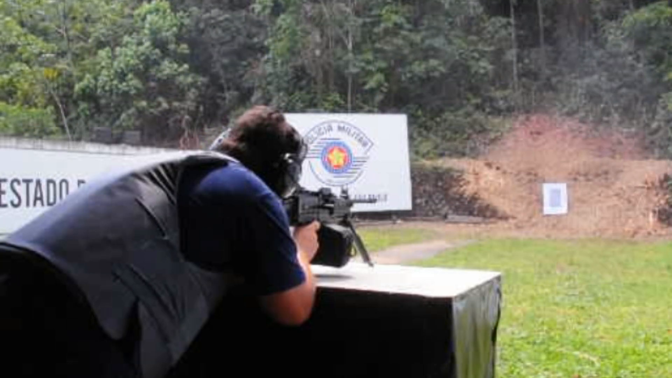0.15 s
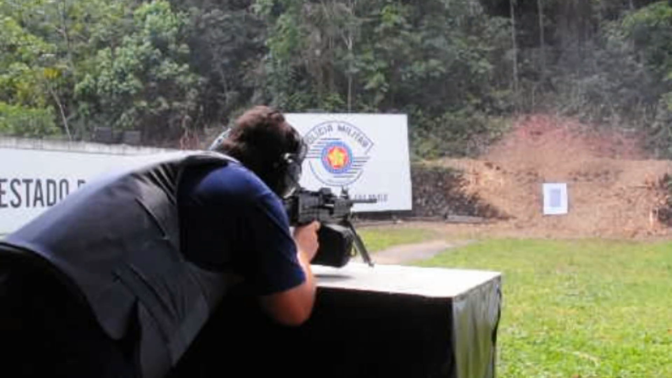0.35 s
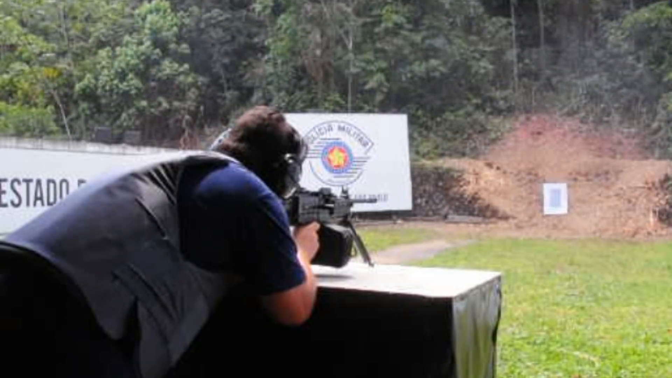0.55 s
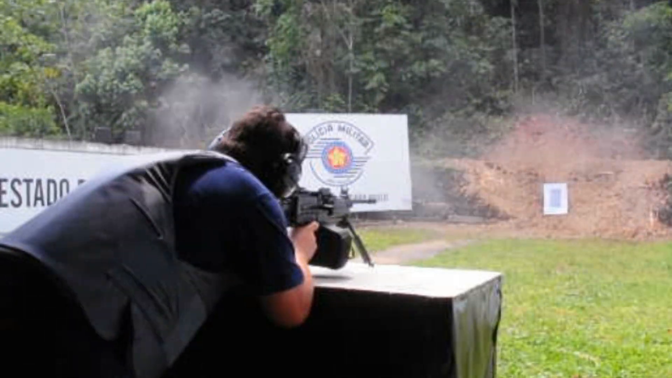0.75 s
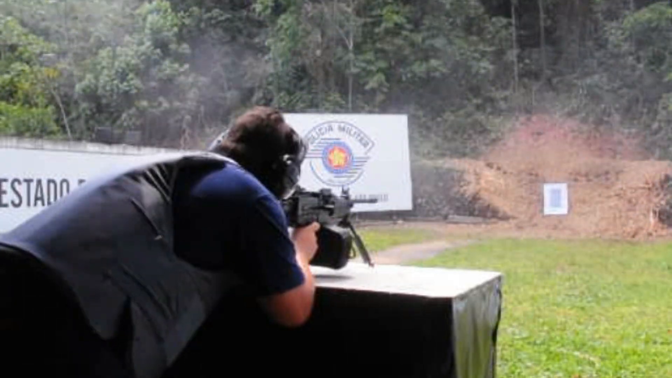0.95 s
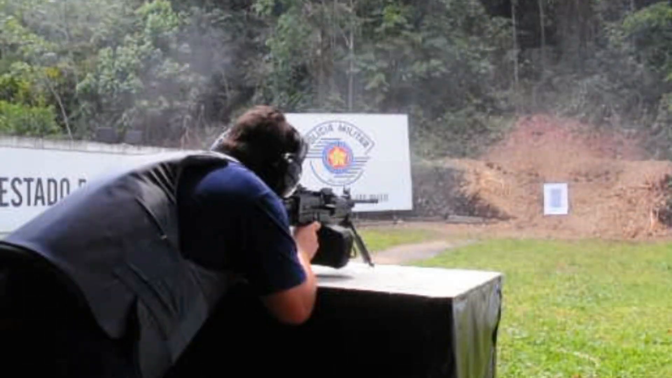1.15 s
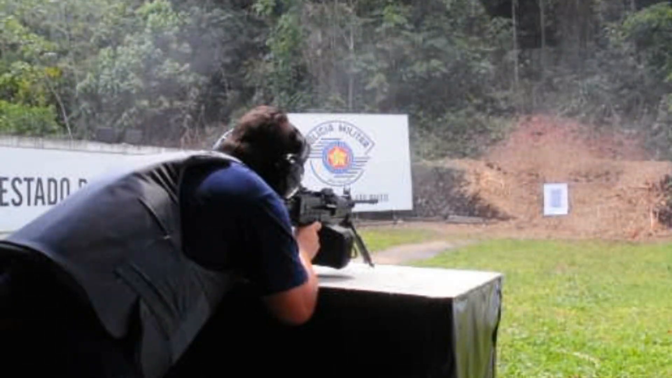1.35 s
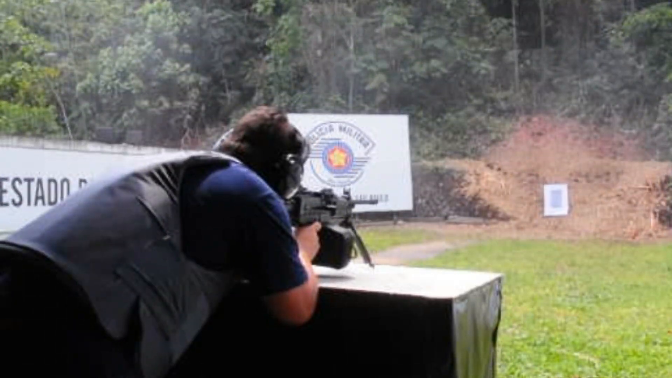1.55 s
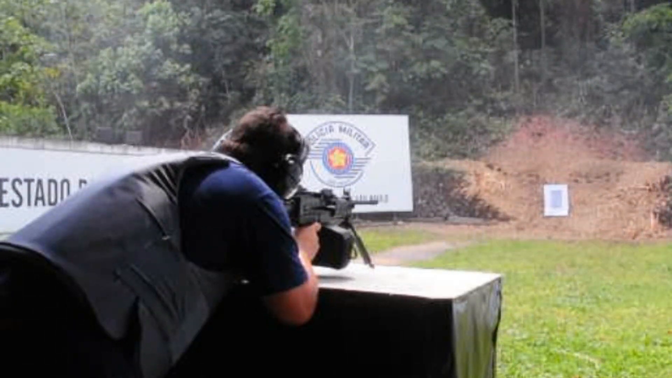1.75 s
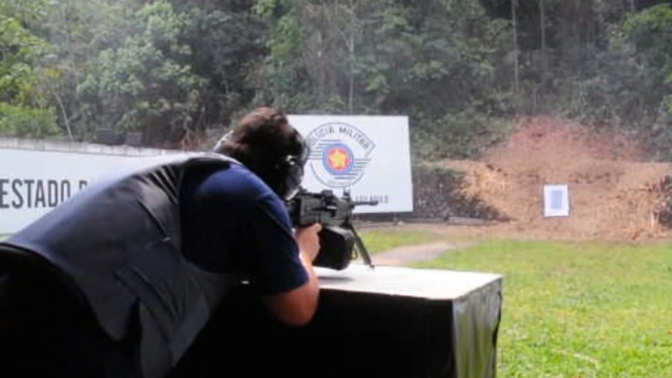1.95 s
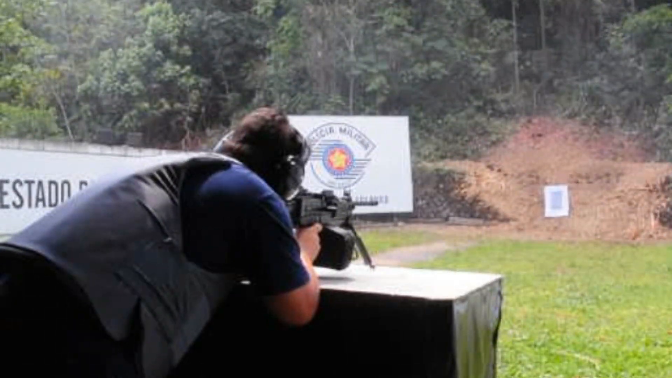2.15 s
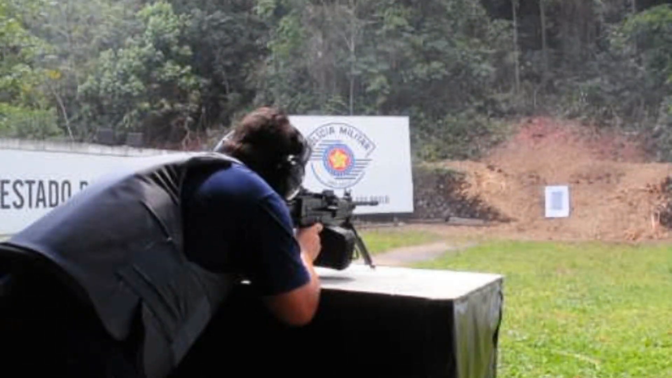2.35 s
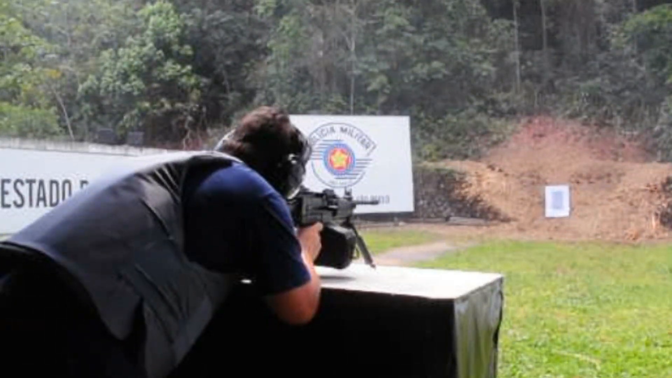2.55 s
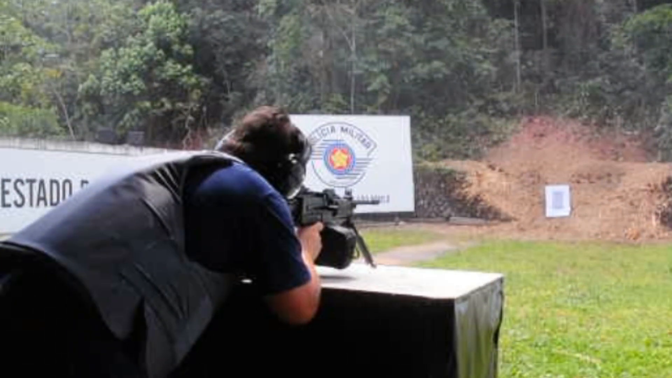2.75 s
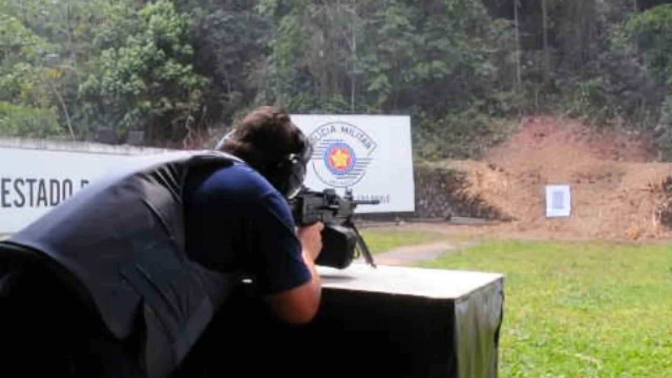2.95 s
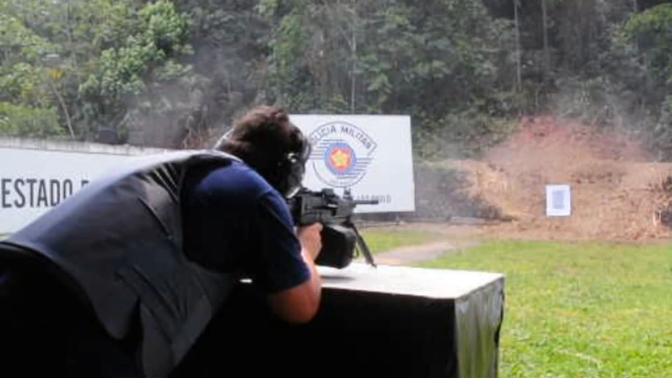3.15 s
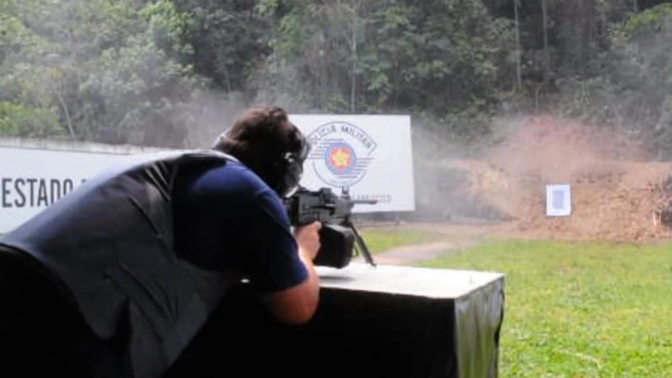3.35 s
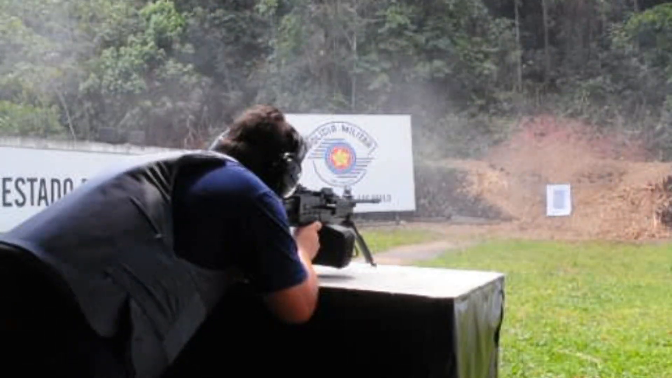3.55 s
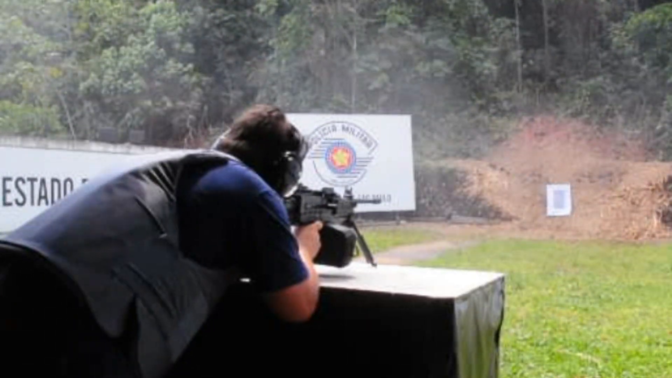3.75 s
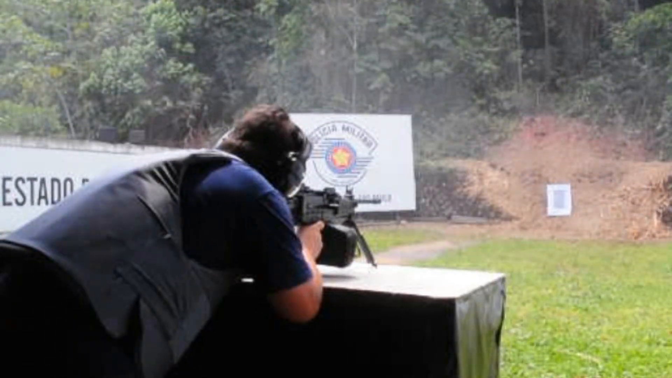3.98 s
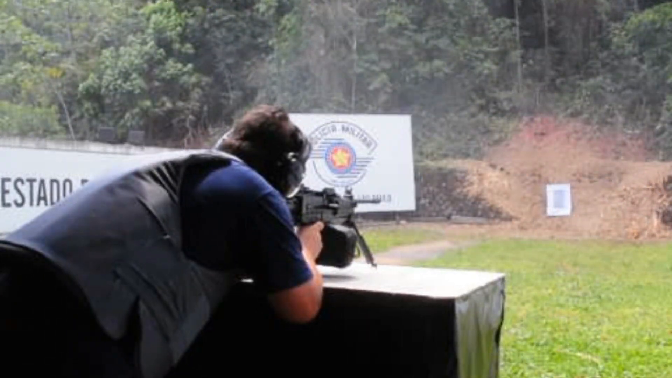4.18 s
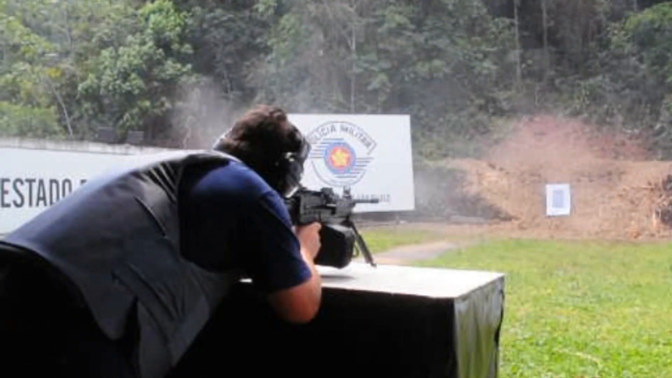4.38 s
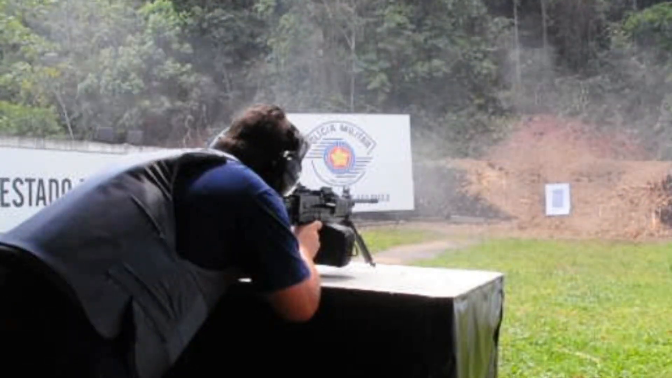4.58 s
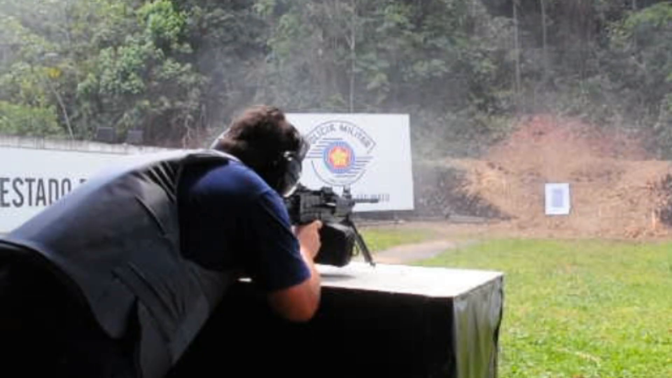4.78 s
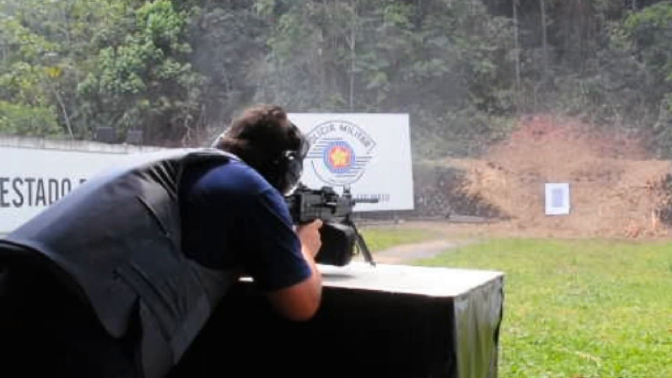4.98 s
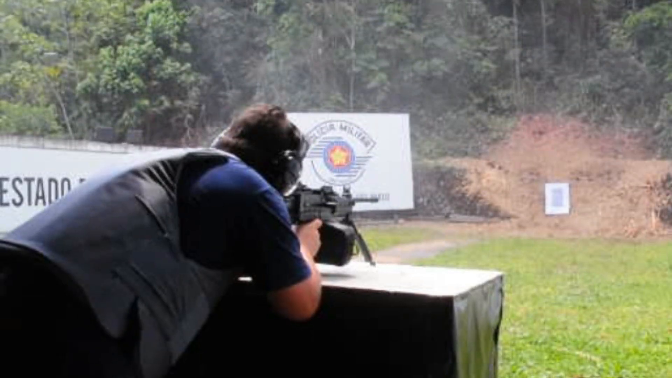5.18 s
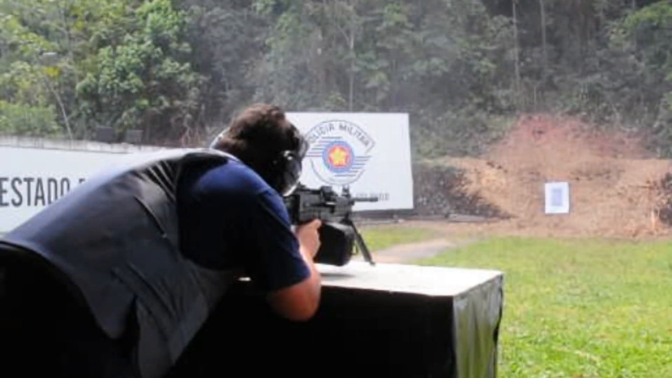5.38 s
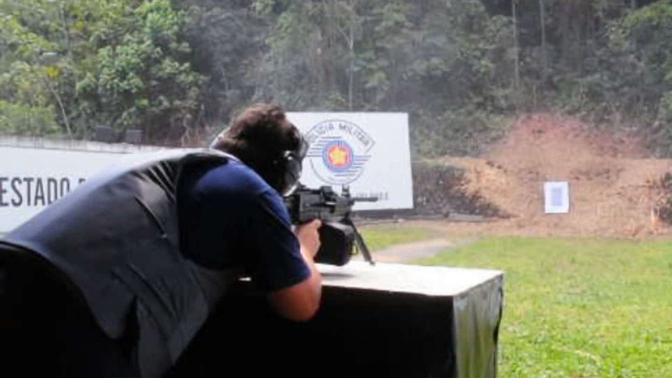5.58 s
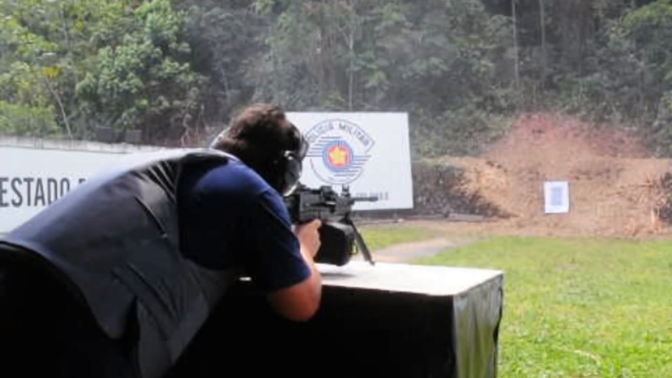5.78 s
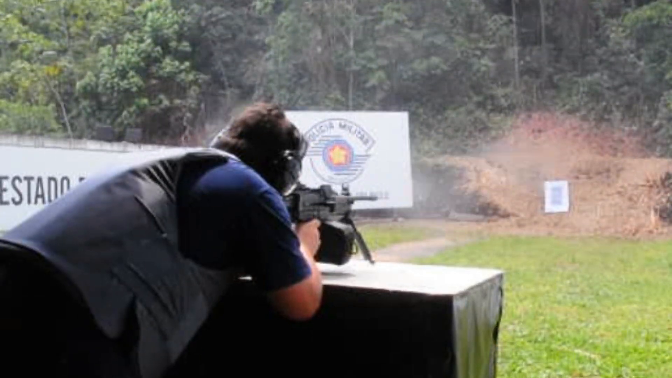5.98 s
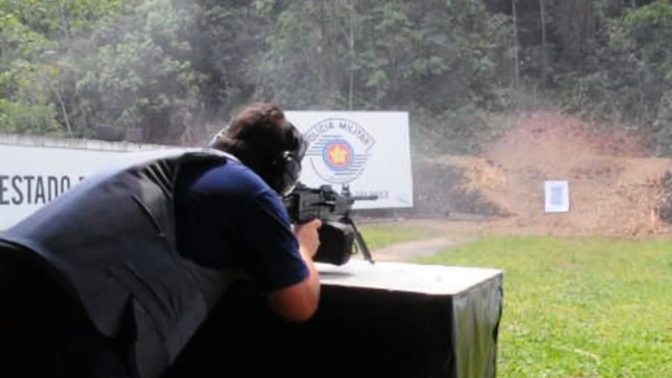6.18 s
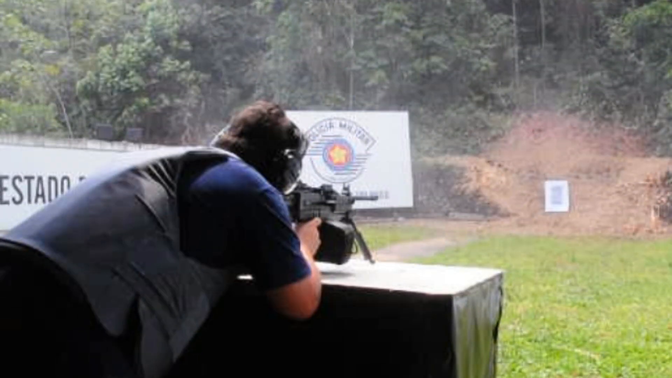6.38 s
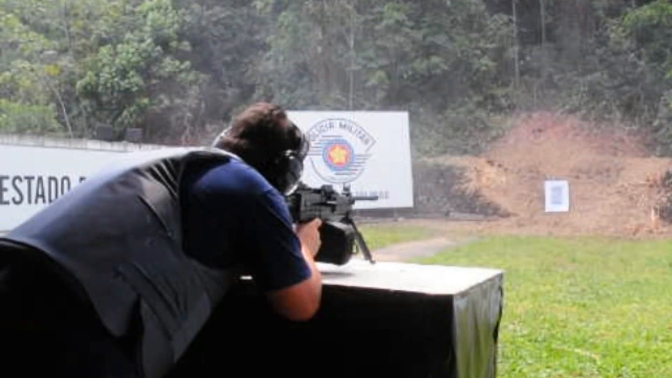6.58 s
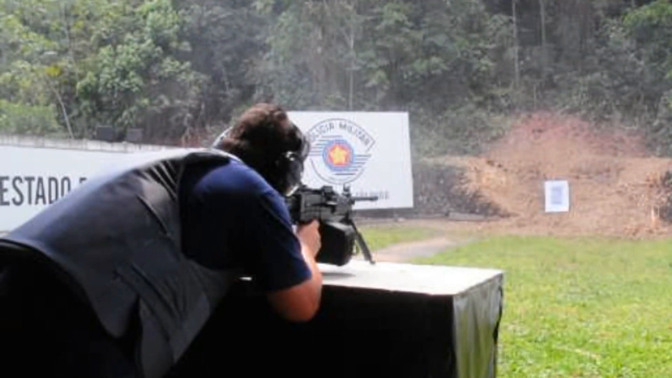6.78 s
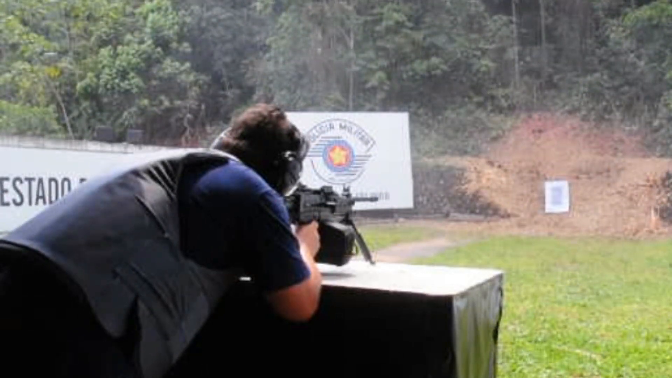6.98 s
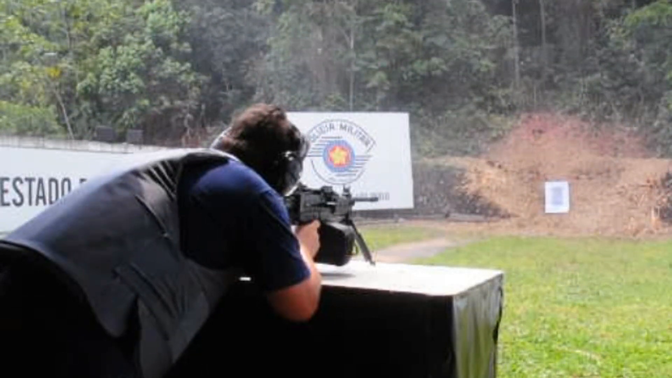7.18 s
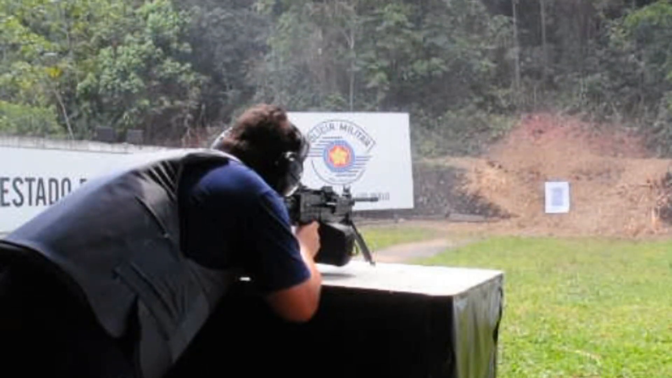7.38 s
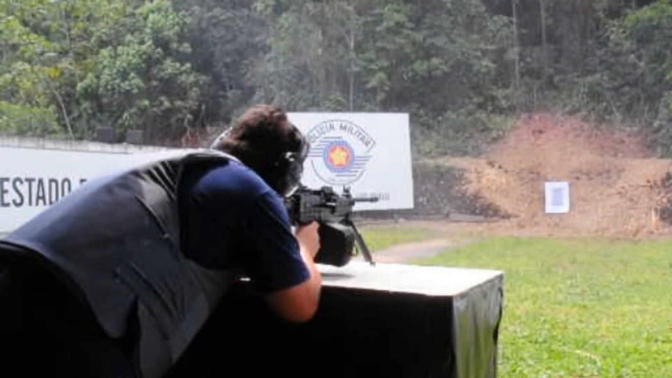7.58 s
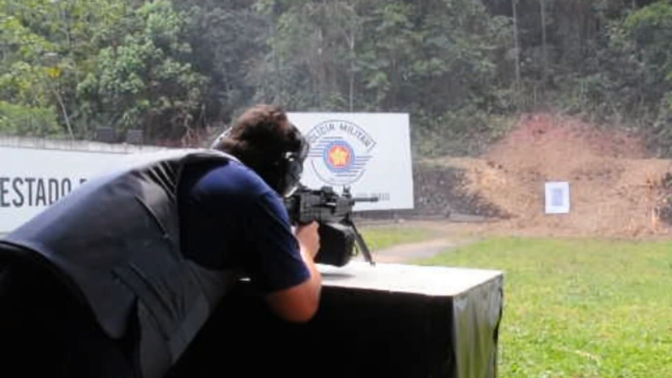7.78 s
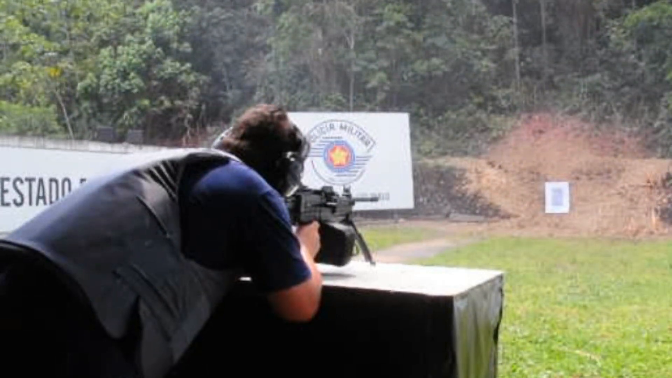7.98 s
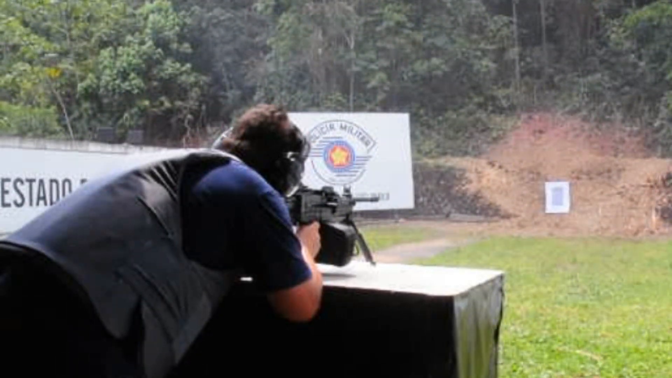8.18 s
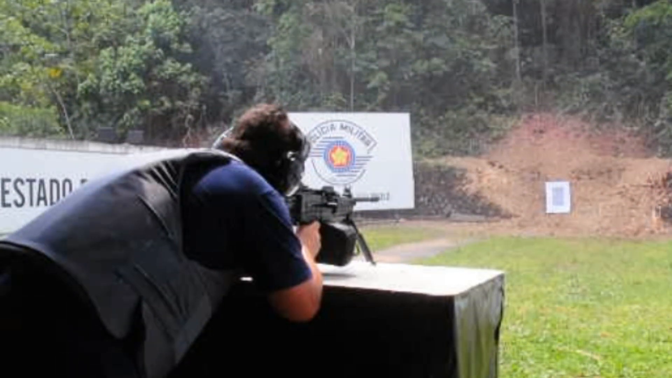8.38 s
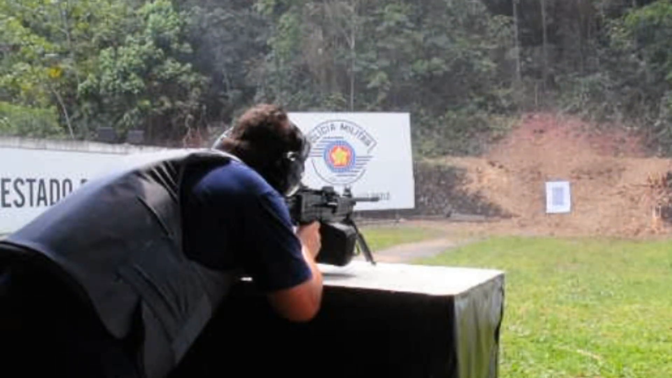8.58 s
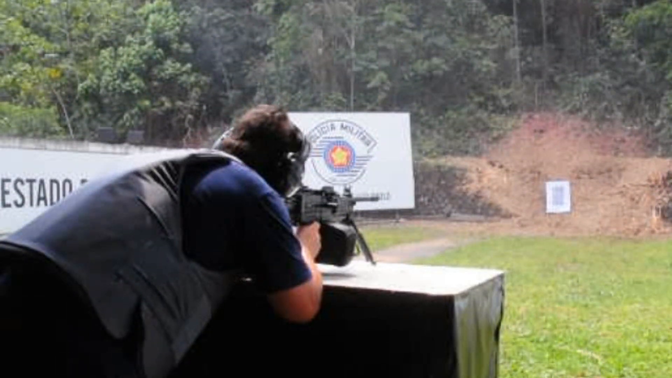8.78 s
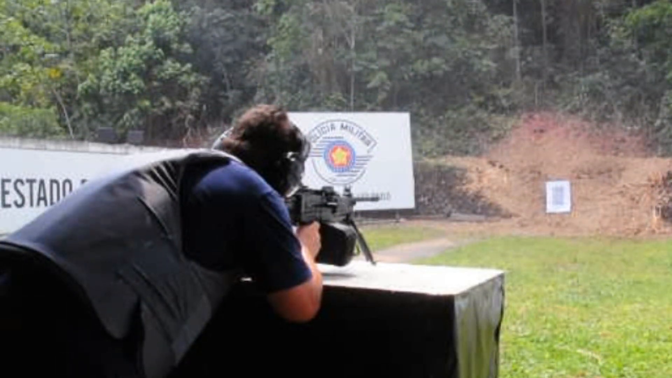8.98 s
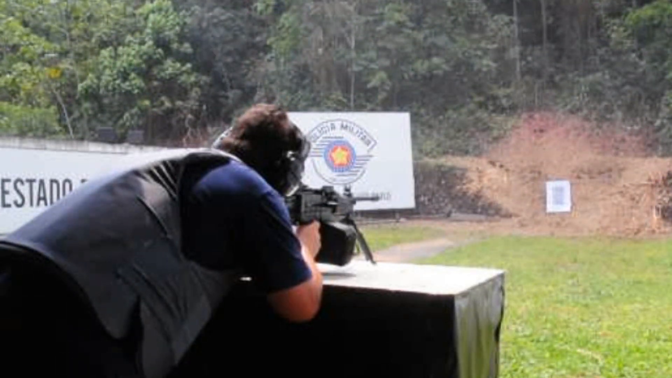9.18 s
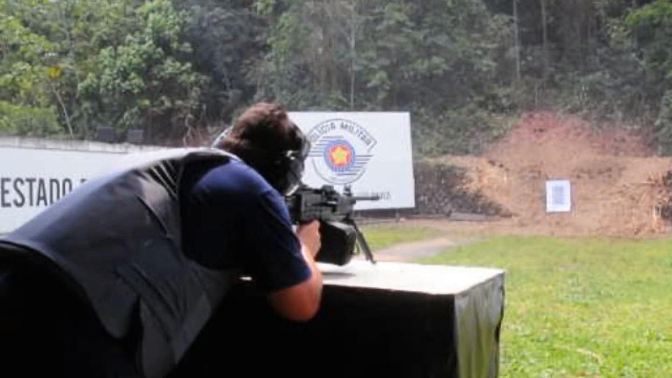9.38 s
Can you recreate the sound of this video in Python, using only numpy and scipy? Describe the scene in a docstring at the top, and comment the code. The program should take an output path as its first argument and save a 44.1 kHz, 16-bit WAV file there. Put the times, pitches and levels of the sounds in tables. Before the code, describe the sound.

Close behind a gunner on an open range, a small trigger click leads to a sharp metallic bolt snap and a double blast. A four-shot burst follows, then two more pairs, all harshly clipped, with blunt reflections and rolling echo from trees and banks. Steady dull outdoor rumble and thin motor whine fill the gaps; finally soft cloth movement and light metal link rattles. The sound is narrow-band and dull on top.

```python
"""A small motor whines over steady outdoor rumble throughout, at an outdoor range.
A belt-fed machine gun on a bench fires four short bursts: bolt run (steel blows and scrape, ringing noise),
then blasts (decaying noise bands), low slaps off banks and walls, and a rolling echo from the wooded hillside.
Afterwards the gunner shifts: cloth rubs (swelling noise), the belt clinks and rattles (short noise rings).
A small narrow-band recorder overloads on the shots and squares them off into a roar."""
import sys
import numpy as np
from scipy import signal
from scipy.fft import rfft, irfft, next_fast_len
from scipy.io import wavfile
from scipy.ndimage import uniform_filter1d

SR = 44100
rng = np.random.default_rng(int(sys.argv[2]) if len(sys.argv) > 2 else 0)


def waveform_to_disk(signal):
    """Save audio, clipped to [-1, 1], as 16-bit WAV at the path in sys.argv[1]."""
    frames = np.transpose(np.atleast_2d(signal))
    scaled = np.clip(frames, -1, 1) * 32767
    samples = np.round(scaled).astype(np.int16)
    wavfile.write(sys.argv[1], SR, samples)


N = 416304

# Spectra give relative level per Hz; noise() scales the result to rms 1.
# outdoor background spectrum: f/Hz, level/dB
AIR_SPECTRUM = [(20, -5), (45, -5.5), (90, -7), (170, 0.5), (420, -2), (520, -7), (820, -10), (1020, -10),
                (1480, -9), (1600, -17), (2100, -18.5), (3300, -22.5), (5000, -36.5)]
# background humps: f/Hz, width/Hz, peak/dB
AIR_RESONANCES = [(1050, 63, 4), (1190, 140, 7.5), (1380, 60, 3)]
# motor lines: mean f/Hz, rms level/dB
MOTOR_LINES = [(416, -52), (586, -56), (1246, -52), (2082, -61), (2910, -67.5), (3397, -72.5)]

# trigger take-up before the first burst: t/s, level/dB, t60/s
TRIGGER_PULL = (.529, -30, 0.16)
# bursts: first shot t/s, rounds/1, bolt run before it/s, action level/dB, mean blast level/dB, echo level/dB
BURST_ROWS = [(0.6315, 2, .0605, 0, 21.5, 0.2), (3.1253, 4, 0.06, -1, 21.5, 0.3),
              (4.417, 2, .057, -4.5, 22.5, .5), (6.0215, 2, 0.055, -1.5, 15.5, 0.4)]
CYCLE_S = 0.085  # round to round
# bolt blows (sear lets go, round stripped, bolt locks): share of run/1, level re action/dB, t60/s
BOLT_STRIKES = [(0, -13.5, .1), (0.369, -2.5, .055), (.9, -7, .1)]
SCRAPE_DB = -17  # re action level
# steel spectrum: f/Hz, level/dB
STEEL_SPECTRUM = [(60, -19), (250, -3.5), (700, -3), (1400, 1), (2300, 3.5), (3500, 3), (5000, -1)]
# steel receiver resonances: f/Hz, width/Hz, peak/dB
RECEIVER_RESONANCES = [(2340, 200, 4), (2670, 390, 3), (4270, 58, 7.3)]

# muzzle blast spectrum: f/Hz, level/dB
BLAST_SPECTRUM = [(30, -20), (100, -13), (270, 2.5), (500, 1), (900, 3.5), (1600, -2), (3000, -6),
                  (5200, -12)]
# blast decay: f/Hz, t60/s
BLAST_DECAY = [(100, 0.84), (300, 0.51), (900, 0.34), (2200, 0.25), (5000, 0.13)]
# firing point's low resonances: f/Hz, width/Hz, peak/dB
FIRING_POINT_RESONANCES = [(137.2, 11, 4.5), (206.2, 19, 5), (273.3, 15.4, 9.5), (361, 8.3, 6.5),
                           (380.7, 35, 1.5)]
# hillside echo spectrum: f/Hz, level/dB
ECHO_SPECTRUM = [(25, -22), (60, -14.5), (95, -22.5), (140, -8.5), (220, -6.5), (330, -3), (450, -5),
                 (630, -9), (1050, -6), (1300, -11.5), (2200, -13), (3600, -19.5), (5200, -18.5)]
# echo loss in air and foliage: f/Hz, loss/(dB/s)
ECHO_ABSORPTION = [(60, 1.5), (140, 3.5), (300, 0.5), (1000, 2.5), (2400, 5.5), (3800, 12), (5000, 30.5)]
# near slope and far woods both swell and hold; then the near part drops fast, the far part slowly
ECHO_SWELL_S, ECHO_HOLD_S = 0.045, 0.35
NEAR_DB, NEAR_FALL_DB_PER_S = 6.5, 50.5
FAR_DB, FAR_FALL_DB_PER_S = -8, 15.5

# slaps: start range after the shot, centre pitch, Gaussian half length to 1/e
SLAPS_PER_SHOT, SLAP_FROM_S, SLAP_TO_S = 2, 0.06, 0.3
SLAP_CENTRE_HZ, SLAP_HALF_S, SLAP_DB = 289, 0.00392, 19

# gunner's moves against the bench: middle t/s, half length/s, cloth level/dB, belt level/dB
GUNNER_MOVES = [(8.195, .1, -48, -45), (8.533, 0.11, -36, -50), (9.0, 0.15, -49, -50)]
# cloth spectrum: f/Hz, level/dB
CLOTH_SPECTRUM = [(40, -11), (130, -6), (280, 10), (600, -7.5), (1500, -15.5), (3000, -12.5), (5000, -21)]
# loudest belt clinks in the box: t/s, level before CLINK_TRIM_DB/dB
BELT_CLINKS = [(8.0834, -34), (8.1947, -28), (8.364, -35), (8.5565, -38), (9.0523, -39), (9.225, -38)]
CLINK_TRIM_DB, CLINK_T60_S = -4.5, 0.087
LINK_KNOCKS_PER_S = 65
# belt box spectrum: f/Hz, level/dB
BELT_BOX_SPECTRUM = [(60, -8.5), (280, 4), (700, 3), (1500, 2.5), (2400, -1), (3200, -3.5), (4000, -7),
                     (5000, -22)]

CONVERTER_IN_HZ, CONVERTER_OUT_HZ, OUTPUT_EDGE_HZ = 5080, 5520, 16600  # low-pass cutoffs
TICK_S = 4.5094  # one sharp tick in the third burst


def gain_of(db):
    """Decibels to amplitude gain."""
    return 10 ** (np.asarray(db) / 20)


def evened(x):
    """Scale to rms 1."""
    return x / np.sqrt(np.mean(x ** 2) + 1e-20)


def read(points, hz):
    """Interpolate a table along log frequency."""
    f, value = np.transpose(points)
    return np.interp(np.log(hz + 1), np.log(f + 1), value)


def add(mix, start_s, sound):
    """Mix a sound in from start_s, cut at the end of the mix."""
    part = mix[round(start_s * SR):][:len(sound)]
    part += sound[:len(part)]


def clock(seconds):
    """Sample times in s, length rounded up to a fast FFT size."""
    return np.arange(next_fast_len(int(seconds * SR), True)) / SR


def noise(size, spectrum, resonances=()):
    """Noise of rms 1: broad spectrum plus narrow resonance peaks."""
    hz = np.fft.rfftfreq(size, 1 / SR)
    db = read(spectrum, hz)
    for f, width, peak_db in resonances:
        db = db + peak_db / (1 + (2 * (hz - f) / width) ** 2)
    white = rng.standard_normal(size)
    return evened(irfft(rfft(white) * gain_of(db), size))


def patches(size, step_s):
    """Unit-variance random values every step_s, joined by straight lines."""
    t = np.arange(size) / SR
    return np.interp(t / step_s, np.arange(1000), rng.standard_normal(1000))


def fade(x, losses, patchy_db):
    """Decay each band at its own rate (f/Hz, loss/(dB/s)), unevenly, as single reflections arrive."""
    t = np.arange(len(x)) / SR
    hz = np.fft.rfftfreq(len(x), 1 / SR)
    spectrum = rfft(x)
    centres, rates = np.transpose(losses)
    out = np.zeros(len(x))
    for one, rate in zip(np.eye(len(centres)), rates):
        share = read(np.c_[centres, one], hz)  # overlapping bands that sum to 1
        level_db = patchy_db * patches(len(x), step_s=0.014) - rate * t
        out += irfft(spectrum * share, len(x)) * gain_of(level_db)
    return out


def low_pass(x, hz, size):
    """Steep low-pass, zero delay."""
    taps = signal.firwin(size, hz, window=("kaiser", 9), fs=SR)
    return signal.oaconvolve(x, taps, "same")


def strikes(rows, spectrum, resonances=(), rise_s=0.00033, ring_db=-22, ring_t60_s=0.28):
    """Metal hits (t/s, level/dB, t60/s): dense clatter plus a weaker, steady-rate ring."""
    out, t = np.zeros(N), clock(0.3)
    for start_s, db, t60_s in rows:
        clatter = gain_of(-60 * t / t60_s)
        ring = gain_of(ring_db - 60 * t / ring_t60_s)
        shape = (1 - np.exp(-t / rise_s)) * (clatter + ring)
        add(out, start_s, gain_of(db) * shape * noise(len(t), spectrum, resonances))
    return out


def motion(levels_db):
    """Gain that swells and fades with each of the gunner's moves."""
    t = np.arange(N) / SR
    gain = np.zeros(N)
    for (middle_s, half_s, *_), db in zip(GUNNER_MOVES, levels_db):
        gain += gain_of(db) * np.exp(-((t - middle_s) / half_s) ** 2)
    return gain


def background(air_db=-38.5, waver=0.003):
    """Outdoor rumble as coloured noise; motor lines share one wavering speed."""
    seconds_turned = np.cumsum(1 + waver * patches(N, step_s=0.04)) / SR
    whine = np.zeros(N)
    for hz, rms_db in MOTOR_LINES:
        whine += gain_of(rms_db) * np.sqrt(2) * np.sin(2 * np.pi * hz * seconds_turned)
    return gain_of(air_db) * noise(N, AIR_SPECTRUM, AIR_RESONANCES) + whine


def action():
    """Trigger take-up, then per burst the sprung bolt strikes the receiver and scrapes along it."""
    out = strikes([TRIGGER_PULL], STEEL_SPECTRUM, RECEIVER_RESONANCES)
    for first_s, _, run_s, action_db, _, _ in BURST_ROWS:
        start_s, size = first_s - run_s, round(run_s * SR)
        blows = [(start_s + share * run_s, action_db + db, t60_s) for share, db, t60_s in BOLT_STRIKES]
        out += strikes(blows, STEEL_SPECTRUM, RECEIVER_RESONANCES)
        scrape = signal.windows.tukey(size, 0.2) * noise(size, STEEL_SPECTRUM, RECEIVER_RESONANCES)
        add(out, start_s, gain_of(action_db + SCRAPE_DB) * scrape)
    return out


def blast(bloom_s=0.051, bloom_hz=520):
    """Bright crack at once; low body swells after it, as ground and shelter reflect it."""
    t = clock(0.7)
    losses = [(hz, 60 / t60_s) for hz, t60_s in BLAST_DECAY]
    bang = fade(noise(len(t), BLAST_SPECTRUM, FIRING_POINT_RESONANCES), losses, patchy_db=2.5)
    body = signal.sosfiltfilt(signal.butter(2, bloom_hz, fs=SR, output="sos"), bang)
    return bang - body * np.exp(-(t / bloom_s) ** 2)


def echo():
    """Trees and banks scatter the shot back; air and foliage dull it with distance."""
    t = clock(3.4)
    late_s = np.maximum(t - ECHO_HOLD_S, 0)
    near = gain_of(NEAR_DB - NEAR_FALL_DB_PER_S * late_s)
    far = gain_of(FAR_DB - FAR_FALL_DB_PER_S * late_s)
    swell = 1 - np.exp(-t / ECHO_SWELL_S)
    scattered = fade(noise(len(t), ECHO_SPECTRUM, FIRING_POINT_RESONANCES), ECHO_ABSORPTION, patchy_db=1.18)
    return scattered * np.hypot(near, far) * swell


def gunfire(variety_rad=0.42, uneven_db=1.15):
    """Shots share their paths, so the echo repeats the burst rhythm; blending two takes varies each shot."""
    out = np.zeros(N)
    blasts = np.array([blast(), blast()])
    echoes = np.array([echo(), echo()])
    for first_s, rounds, _, _, blast_db, echo_db in BURST_ROWS:
        for k, (turn, charge) in enumerate(rng.standard_normal((round(rounds), 2))):
            shot_s = first_s + k * CYCLE_S
            blend = np.array([np.cos(variety_rad * turn), np.sin(variety_rad * turn)])
            add(out, shot_s, gain_of(blast_db + uneven_db * charge) * blend @ blasts)
            add(out, shot_s, gain_of(echo_db) * blend @ echoes)
    return out


def slaps(octaves=0.6):
    """Strong, dull single reflections off banks and walls: Gaussian cosine bursts a few cycles long."""
    out, t = np.zeros(N), clock(0.03)
    u = t - t.mean()
    envelope = np.exp(-(u / SLAP_HALF_S) ** 2)
    for first_s, rounds, *_ in BURST_ROWS:
        for k in range(round(rounds)):
            for when, pitch, phase_rad in rng.random((SLAPS_PER_SHOT, 3)):
                hz = SLAP_CENTRE_HZ * 2 ** (octaves * (pitch - 0.5))
                wave = envelope * np.cos(2 * np.pi * (hz * u + phase_rad))
                delay_s = SLAP_FROM_S + when * (SLAP_TO_S - SLAP_FROM_S)
                add(out, first_s + k * CYCLE_S + delay_s, gain_of(SLAP_DB) * wave)
    return out


def gunner(grain_db=2.0):
    """Clothing rubs over stock and bench: coloured noise with small random catches."""
    catches = evened(uniform_filter1d(rng.standard_normal(N), size=500))
    swell = motion([cloth_db for _, _, cloth_db, _ in GUNNER_MOVES])
    return noise(N, CLOTH_SPECTRUM) * swell * gain_of(grain_db * catches)


def belt(spread_db=3):
    """Clear clinks, plus random link knocks that ring briefly and follow the gunner's moves."""
    knocks = (rng.random(N) < LINK_KNOCKS_PER_S / SR) * gain_of(spread_db * rng.standard_normal(N))
    knocks = knocks * motion([belt_db for *_, belt_db in GUNNER_MOVES])
    decay = gain_of(-60 / (CLINK_T60_S * SR))  # per sample
    envelope = signal.lfilter([1], [1, -decay], knocks + 1e-18)
    clinks = [(t_s, db + CLINK_TRIM_DB, CLINK_T60_S) for t_s, db in BELT_CLINKS]
    return envelope * noise(N, BELT_BOX_SPECTRUM) + strikes(clinks, BELT_BOX_SPECTRUM)


def scene():
    """Sum of all sources at the microphone."""
    return (background() + action() + gunfire() + slaps() + gunner() + belt())[None]


def converter(x, ceiling, count=4):
    """Keep every fourth sample, hard-clipped; smoothing leaves ripples on the flat tops."""
    kept = np.zeros(N)
    kept[::count] = np.clip(low_pass(x, CONVERTER_IN_HZ, size=181)[::count], -ceiling, ceiling)
    return low_pass(count * kept, CONVERTER_OUT_HZ, size=141)


def record(dry, input_ceiling_db=-7.5, output_ceiling_db=-7.5, hardness=24, bend=0.034, tick_db=-2):
    """Converter overloads; the next stage bends, then shaves the ripples, adding fizz above the band."""
    narrow = converter(dry[0], gain_of(input_ceiling_db))
    bent = narrow * (1 - bend * narrow ** 2)
    overload = abs(bent / gain_of(output_ceiling_db))
    clipped = bent / (1 + overload ** hardness) ** (1 / hardness)
    at = round(TICK_S * SR)
    clipped[at:at + 2] -= gain_of(tick_db) * np.sign(clipped[at])  # two-sample sign flip ticks
    return low_pass(clipped, OUTPUT_EDGE_HZ, size=511)[None]


dry = scene()
out = record(dry)
waveform_to_disk(out)
```